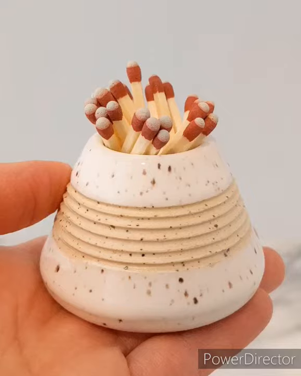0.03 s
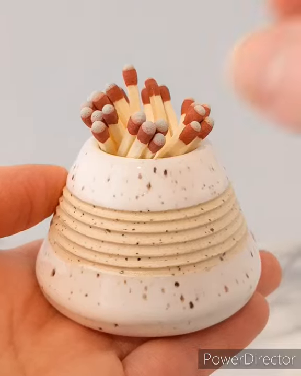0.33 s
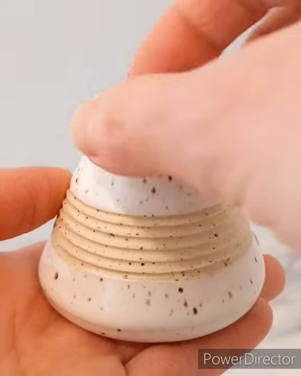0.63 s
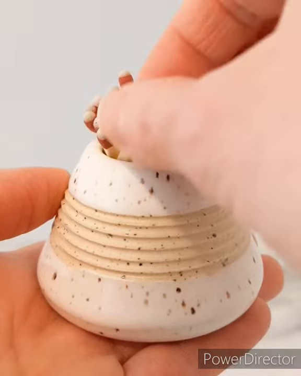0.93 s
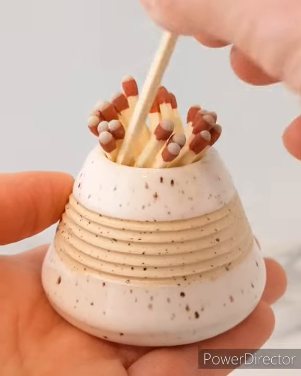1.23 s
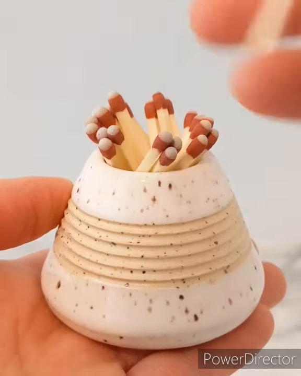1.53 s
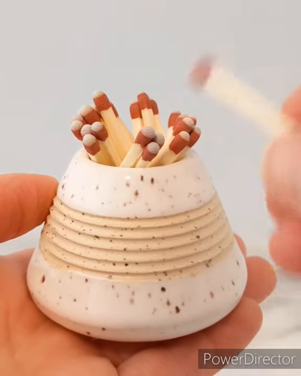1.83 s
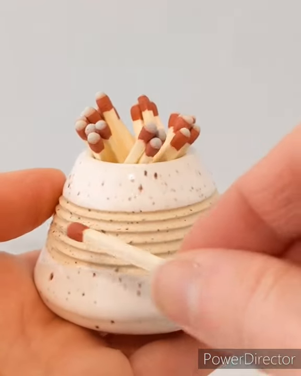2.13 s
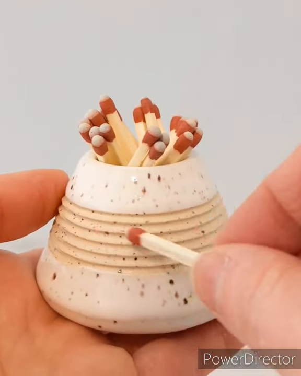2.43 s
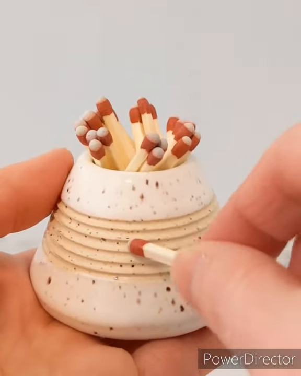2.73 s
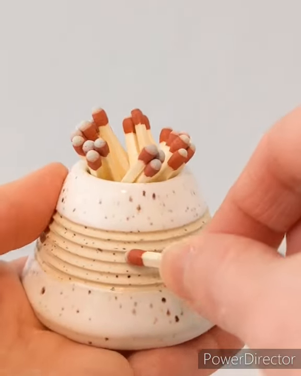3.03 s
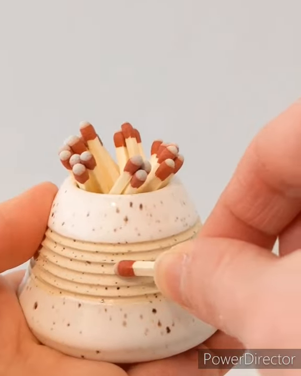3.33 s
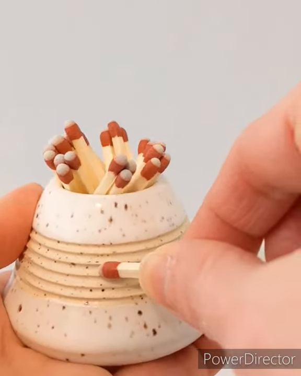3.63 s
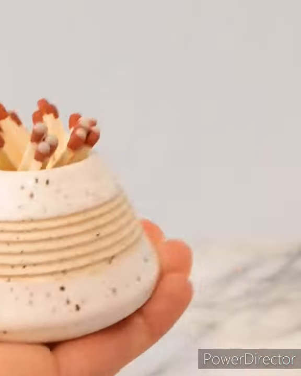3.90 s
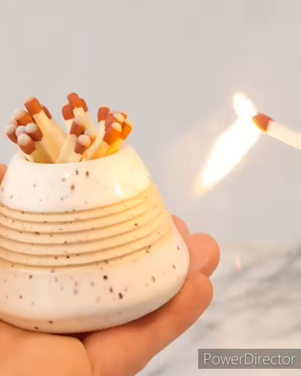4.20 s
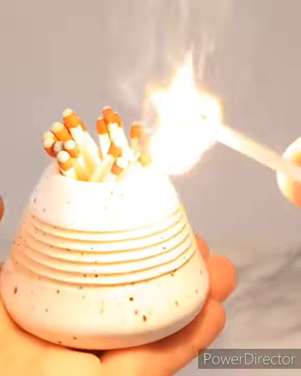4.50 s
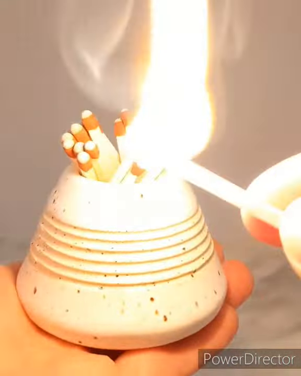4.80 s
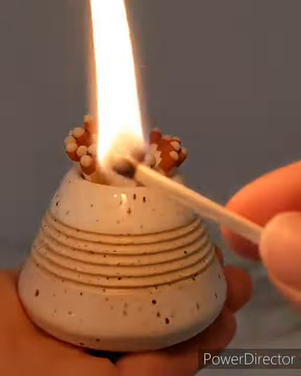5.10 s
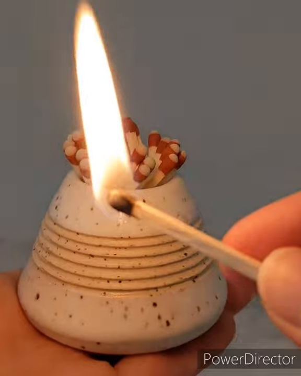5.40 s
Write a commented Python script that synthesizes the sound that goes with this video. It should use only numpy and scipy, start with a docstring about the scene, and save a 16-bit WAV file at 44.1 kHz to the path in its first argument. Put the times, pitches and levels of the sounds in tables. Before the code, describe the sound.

Matchsticks rattle faintly in a ceramic pot, then one match strikes with a sharp snap, fizzes for a second and settles to a quiet flame.

```python
"""Striking a match on stoneware

A match is drawn from a hand-held pot in a quiet room: sticks rattle and the head catches on the ribs.
Stick-slip friction in one fast stroke rings the pot, and ignition puffs air at the right microphone
port. The head fizzes and spits for about a second, then leaves a quiet flame over ventilation rumble."""
import sys
import numpy as np
from scipy import signal
from scipy.fft import rfft, irfft, next_fast_len
from scipy.io import wavfile
from scipy.ndimage import map_coordinates

SR = 44100
rng = np.random.default_rng(int(sys.argv[2]) if len(sys.argv) > 2 else 0)


def master(y):
    """Save y as 16-bit WAV."""
    cut = np.clip(np.atleast_2d(y).T, -1, 1)
    pcm = np.round(cut * 32767)  # scale
    wavfile.write(sys.argv[1], SR, pcm.astype(np.int16))


N = 244755
TIME = np.arange(N) / SR
IGNITION_S, LIGHT_S, LIGHT_ATTACK_S, SPENT_S, SPENT_T60_S = 3.9708, 4.03, 0.034, 5.17, 0.11
HEAD_DB, SAG_DB_PER_S, FLAME_DB = -55, 1.5, -73.5
GAS_DB, SIZZLE_DB = 2.5, -3.5  # relative to the burn level
ROOM_DB, ROOM_LAG_S = -50.5, 0.00027  # the rumble reaches the left port later
OPEN_S, TOP_HZ = 0.12, 15600

# jerks of the striking stroke: (time [s], relative level [dB], decay t60 [s])
STROKE_JERKS = [(3.9610, -31, 0.0029), (3.962, -44, .035), (3.9690, -33.5, 0.022), (3.9709, -9.5, 0.0045),
                (3.9730, -16.5, 0.027), (3.982, -22, 0.029)]
# resonances of the pot: (frequency [Hz], bandwidth [Hz], gain [dB])
POT_MODES = [(1950, 650, 3.5), (2650, 500, -4.5), (4340, 260, 4), (6340, 500, -0.5), (7100, 370, 5.5),
             (8600, 900, 2), (12030, 600, 5.5), (13500, 900, 1)]
# spectral shapes: (frequency [Hz], gain [dB])
GRIT_SPECTRUM = [(300, -9), (900, -16.5), (2000, -8), (2900, -9), (3700, -25), (4300, -5.5), (5300, -2.5),
                 (8500, 5.5), (11000, 1.5), (14000, 6), (16000, -5.5)]  # head scraping on clay
TAIL_SPECTRUM = [(300, -3), (1200, -4), (3000, 0.5), (4800, 1.5), (9000, 0.5), (15000, -7.5)]  # the room's answer to the stroke
GAS_SPECTRUM = [(120, -23.5), (280, 4), (480, -1.5), (600, -1.5), (710, 7), (850, -2), (1500, -0.5),
                (2700, -5.5), (4500, -6.5), (6000, -11.5), (8000, -14.5), (12000, -23)]  # gas rushing from the head
SIZZLE_SPECTRUM = [(3000, -9), (5700, 0), (6900, 0), (7600, 0.5), (9500, -0.5), (11500, 0), (13500, -4),
                   (15500, -11)]  # cells bursting in the head
SHADOW_SPECTRUM = [(2400, 0), (2900, 7.5), (3900, 3), (4700, -6.5), (6800, 4), (10000, -4.5), (13500, 1)]  # the pot screening the left port
SKIN_SPECTRUM = [(1000, -6.5), (4000, -6), (7000, -4), (9000, 0), (12000, -3), (14000, -6), (15500, -11)]  # skin and sleeve brushing
VENT_SPECTRUM = [(25, -45.5), (38, -34), (54, 1), (80, -3), (100, -4.5), (150, -2), (200, -9.5), (300, -19),
                 (500, -26.5), (1100, -28.5), (1500, -32), (2100, -36), (3000, -43.5), (7000, -49.5),
                 (13000, -54), (15500, -61.5)]  # ventilation rumble
# fresh patches of the head flaring: (time [s], half length [s], gas lift [dB], sizzle lift [dB])
FLARE_JETS = [(4.086, 0.021, 7, 6), (4.198, 0.025, 0.5, -1.5), (4.264, 0.024, 4, 7.5),
              (4.328, 0.022, 0.5, 7.5), (4.397, 0.021, 3.5, 6), (4.592, .03, 1.5, 5),
              (4.633, 0.024, 2, 6.5), (4.754, 0.016, 2.5, -0.5), (4.862, 0.02, 1.5, 6.5),
              (4.93, 0.021, 2, 1.5), (5.03, 0.016, 0, 7), (5.093, 0.012, -4, 5.5), (5.143, 0.036, -4, 2.5)]
# brief impulses: (time [s], relative level [dB], ring frequency [Hz], left minus right [dB])
HEAD_SPITS = [(4.0895, -36, 5230, 1), (4.1524, -44.5, 7130, 1), (4.2168, -33, 6210, -2),
              (4.2303, -33, 5100, -4), (4.2502, -25, 7500, 3), (4.3203, -38, 6300, 2),
              (4.3684, -41, 8100, -6), (5.0438, -40, 3060, -10), (5.2827, -45, 4600, -1)]  # the burning head spitting
STICK_KNOCKS = [(1.1003, -42, 6400, -3), (1.1193, -48, 8756, -3), (1.214, -53, 5900, -7),
                (1.2725, -53, 5040, -6), (1.2885, -53.5, 9000, -6), (1.2974, -52, 3780, -5),
                (1.3422, -50, 6800, 5), (1.353, -48, 5600, -5), (1.4323, -46.5, 8800, -1),
                (1.4503, -41.5, 8950, -5), (1.4542, -40.5, 11800, 0), (1.5384, -49.5, 9200, -4),
                (1.5728, -52, 7900, -4), (1.5973, -50.5, 9300, -9)]  # sticks knocking in the pot
RIB_CATCHES = [(2.308, -55, 5150, -3), (2.3176, -54, 7780, 7), (2.686, -55, 7200, -6),
               (2.6922, -45, 8050, -11.5), (3.2316, -43, 5870, -2.5), (3.3033, -54, 10800, 1),
               (3.3235, -57, 8000, -3), (3.3488, -42.5, 9400, -7.5), (3.3537, -46, 9100, 3),
               (3.3898, -41, 3830, -3), (3.3945, -49, 13500, -2), (3.456, -38.5, 10200, 3),
               (3.468, -39.5, 4000, -4), (3.4745, -50, 7000, -2)]  # the head catching on the ribs
WALL_BUMPS = [(2.3855, -39.5, 2040, 3), (2.464, -50, 2100, -2), (3.3893, -45, 1500, 1)]  # the stick bumping the pot's wall
# drawn stick squeaking: (time [s], half length [s], frequency [Hz], level [dB], left minus right [dB])
STICK_SQUEAKS = [(1.356, 0.004, 3600, -64.5, 0), (1.388, 0.03, 3470, -74, 3),
                 (1.359, 0.0063, 8050, -61, -1), (1.426, 0.0054, 1110, -57, -8),
                 (1.447, 0.0053, 1072, -66, -8), (1.577, .008, 8060, -62, -4)]
# sliding contacts: (time [s], half length [s], relative level [dB])
HEAD_DRAGS = [(1.333, .1, -81), (3.221, .007, -64), (3.268, .02, -67), (3.374, .01, -64),
              (3.475, 0.011, -59)]  # match heads dragging with a fine crackle
HAND_BRUSHES = [(0.962, 0.025, -74), (1.12, 0.07, -74), (1.394, 0.072, -72.5), (1.6, 0.074, -68.5),
                (1.759, 0.04, -66), (1.9, 0.064, -66.5), (2.054, 0.09, -61.5), (2.227, 0.015, -64.5),
                (2.904, 0.1, -76.5), (3.427, 0.11, -81)]  # skin and sleeve, one row for each move
# standing waves in the ventilation: (frequency [Hz], bandwidth [Hz], gain [dB])
DUCT_MODES = [(423.7, 22, 1), (564, 19, 2), (670, 56, -0.5), (802, 17, -1.5), (909, 34, 3), (1001, 14, 5.5),
              (1133, 33, 4), (5040, 23, 9)]
# likeness of the rumble at the two ports: (frequency [Hz], coherence [0-1])
VENT_COHERENCE = [(60, 0.93), (200, 1), (300, 0.8), (640, 0.4), (1400, 0.03)]
# balance of the rumble: (frequency [Hz], left minus right [dB])
VENT_BALANCE = [(200, -0.5), (1300, 1.5), (2400, 0.5), (4400, -4.5), (9000, -4), (15000, -1)]


def strike():
    """Stick-slip friction: jerks over the grit excite the hand-damped pot, and the room reverberates."""
    force = sum(undb(db) * fade(TIME - s, t60) for s, db, t60 in STROKE_JERKS)
    friction = grains(rate=11000, spread_db=-4.5) * force
    ring = sum(undb(db) * resonate(resonate(friction, hz, width), hz, width)
               for hz, width, db in POT_MODES)
    scrape = colour(friction, GRIT_SPECTRUM) + ring
    tail = undb(-11.0) * colour(scatter(friction, t60=0.17, wet_db=18.0), TAIL_SPECTRUM)
    return pan(scatter(scrape, t60=0.092, wet_db=-11.5) + tail, 2.5)


def puff(push_s, lag_s, suck_s, push_db, suck_db, port_hz, left_db):
    """Pressure pulse: compression, then rarefaction; the right port's bass cut rings on as a thump."""
    t = TIME - IGNITION_S
    push = undb(push_db) * np.exp(-(t / push_s) ** 2)
    suction = undb(suck_db) * fade(t - lag_s, suck_s)
    right = highpass(push - suction, port_hz, order=5)
    left = undb(left_db) * highpass(right, 1400, order=2)
    return np.array([left, right])


def flare():
    """Combustion noise: gas rushes, cells burst and spit; the pot slowly shadows the left port."""
    gas_lift_db = sum(db * swell(s, length) for s, length, db, _ in FLARE_JETS)
    sizzle_lift_db = sum(db * swell(s, length) for s, length, _, db in FLARE_JETS)
    gas = hiss(GAS_SPECTRUM, rate=7000, spread_db=3.0, diffuse_db=3.0)
    gas *= undb(GAS_DB + gas_lift_db + 1.8 * walk(70))
    sizzle = hiss(SIZZLE_SPECTRUM, rate=4500, spread_db=0.5, diffuse_db=5.0)
    sizzle *= undb(SIZZLE_DB + sizzle_lift_db + 1.9 * walk(45))
    fizz = moving_comb((gas + sizzle) * burn(), spacing_hz=110.4, depth_db=3.5, rate=9)
    shadow = np.interp(TIME, [4.25, 4.75], [0, 1])
    fizz[0] = (1 - shadow) * fizz[0] + shadow * colour(fizz[0], SHADOW_SPECTRUM)
    side_db = np.interp(TIME, [4.05, 4.2, 4.8], [4, -2.5, -4])
    spits = ticks(HEAD_SPITS, snap=14, crumble_t60=0.01, ring_db=-13, width_hz=600,
                  low_hz=800, dull_hz=10400, gain_db=12.5)
    return pan(fizz, side_db) + scatter(spits, t60=0.037, wet_db=5.5)


def burn():
    """Power addition: the envelope of the head, sagging until spent, joins that of the quiet flame."""
    lit = np.clip((TIME - LIGHT_S) / LIGHT_ATTACK_S, 0, 1)
    head = undb(HEAD_DB - SAG_DB_PER_S * (TIME - LIGHT_S))
    release = fade(np.maximum(TIME - SPENT_S, 0), SPENT_T60_S)
    return lit * np.hypot(head * release, undb(FLAME_DB))


def handling():
    """Impact and friction: sticks rattle and squeak, the head catches and drags, the hand brushes."""
    rattles = ticks(STICK_KNOCKS, snap=7.8, crumble_t60=0.005, ring_db=4.5, width_hz=1200,
                    low_hz=2900, dull_hz=11500, gain_db=14.0)
    catches = ticks(RIB_CATCHES, snap=8.0, crumble_t60=0.015, ring_db=3.0, width_hz=3700,
                    low_hz=1550, dull_hz=12600, gain_db=15.5)
    bumps = ticks(WALL_BUMPS, snap=3.6, crumble_t60=0.037, ring_db=-4, width_hz=650,
                  low_hz=420, dull_hz=2970, gain_db=12)
    body = undb(4) * resonate(bumps, hz=720, width_hz=370)
    squeaks = sum(squeak(*row) for row in STICK_SQUEAKS)
    drag = sum(undb(db) * swell(s, length) for s, length, db in HEAD_DRAGS)
    crackle = unit(highpass(grains(rate=670, spread_db=2.5), 2700, order=2)) * drag
    contacts = rattles + catches + bumps + body + crackle
    return brush() + scatter(contacts, t60=0.069, wet_db=-1.0) + squeaks


def ticks(table, snap, crumble_t60, ring_db, width_hz, low_hz, dull_hz, gain_db):
    """Impulse excitation: a snap and a short crumble of micro-slips ring the stick at its own pitch."""
    out, t = np.zeros((2, N)), np.arange(2048) / SR
    lowpass = signal.butter(2, dull_hz, fs=SR, output="sos")
    for s, db, hz, side_db in table:
        slips = rng.standard_normal(len(t)) ** 3 / 4 * fade(t, crumble_t60)  # cubing makes noise spiky
        slips[0] += snap
        slips = signal.sosfilt(lowpass, highpass(slips, low_hz, order=2))
        tick = unit(slips) + undb(ring_db) * unit(resonate(slips, hz, width_hz))
        tick *= undb(db + gain_db) / np.linalg.norm(tick)
        start = int(s * SR)
        out[:, start:start + len(t)] += pan(tick[:N - start], side_db)
    return out


def squeak(s, length, hz, db, side_db, jitter_hz=260):
    """Frictional vibration: the drawn stick rubs its neighbours, its pitch jittering as it slips."""
    pitch_hz = hz + jitter_hz * walk(1500)
    rub = unit(np.sin(2 * np.pi * np.cumsum(pitch_hz) / SR))
    return pan(rub * swell(s, length) * undb(db), side_db)


def brush():
    """Sliding friction: skin and sleeve hiss with each move of the hand."""
    moves = sum(undb(db) * swell(s, length) for s, length, db in HAND_BRUSHES)
    rub = hiss(SKIN_SPECTRUM, rate=15000, spread_db=2.5, diffuse_db=-3)
    rub *= moves * undb(3.2 * walk(39.74))
    return pan(moving_comb(rub, spacing_hz=151.7, depth_db=3.5, rate=5.17), -4.0)


def ventilation():
    """Standing waves colour a rumble that is coherent at both ports in the bass and swells a little."""
    coherence = over_bins(VENT_COHERENCE, N)
    mid, side = rfft(rng.standard_normal((2, N)))
    side *= np.sqrt((1 - coherence) / (1 + coherence))
    delay = np.exp(-2j * np.pi * np.arange(len(mid)) * SR / N * ROOM_LAG_S)
    air = colour(irfft(np.array([(mid + side) * delay, mid - side]), N), VENT_SPECTRUM)
    air += sum(undb(db) * resonate(air, hz, width) for hz, width, db in DUCT_MODES)
    for port, sign in enumerate((1, -1)):
        air[port] = colour(air[port], [(hz, sign * db / 2) for hz, db in VENT_BALANCE])
    swell_db = np.interp(TIME, [0, 2.5], [-1, .5]) + .5 * walk(7.4)
    return air / np.std(air.mean(0)) * undb(ROOM_DB + swell_db)


def grains(rate, spread_db):
    """Shot noise: about `rate` clicks a second, of uneven size, with a random weight at each port."""
    size = undb(spread_db * np.minimum(rng.exponential(size=N), 5))
    onsets = rng.random(N) < rate / SR
    return unit(onsets * size * rng.standard_normal((2, N)))


def hiss(spectrum, rate, spread_db, diffuse_db):
    """Superposition: grains lie within smooth noise that stands for their diffuse reflections."""
    both = grains(rate, spread_db) + undb(diffuse_db) * rng.standard_normal((2, N))
    return unit(colour(both, spectrum))


def scatter(x, t60, wet_db):
    """Reverberation: direct sound plus reflections off hands, table and walls, different at each port."""
    t = np.arange(SR // 4) / SR
    tail = rng.standard_normal((2, len(t))) * fade(t - .0003, t60)
    response = undb(wet_db) * tail / np.sqrt(np.sum(tail ** 2) / 2)
    response[[0, 1], [3, 0]] += 1  # the direct sound reaches the right port 3 samples sooner
    return signal.fftconvolve(x, response, axes=1)[:, :N] / np.hypot(1, undb(wet_db))


def moving_comb(x, spacing_hz, depth_db, rate):
    """Interference: a drifting random spectral ripple stands for echoes off pot and moving fingers."""
    hz, s, frames = signal.stft(x, SR, nperseg=1024)
    field = rng.standard_normal((1024, 256))
    grid = np.meshgrid(hz / spacing_hz, s * rate, indexing="ij")
    ripple = map_coordinates(field, grid, order=1, mode="mirror")
    return signal.istft(frames * undb(depth_db * ripple), SR)[1][..., :N]


def resonate(x, hz, width_hz):
    """Second-order resonance, gain 1 at its centre."""
    return signal.lfilter(*signal.iirpeak(hz, hz / width_hz, fs=SR), x)


def highpass(x, hz, order):
    """Attenuation below a cutoff."""
    return signal.sosfilt(signal.butter(order, hz, "high", fs=SR, output="sos"), x)


def colour(x, points):
    """Spectral shaping by (frequency [Hz], gain [dB]) points."""
    n = next_fast_len(x.shape[-1])
    return irfft(rfft(x, n) * undb(over_bins(points, n)), n)[..., :x.shape[-1]]


def over_bins(points, n):
    """Log-frequency interpolation onto the bins of an n-point transform."""
    hz, value = np.transpose(points)
    bin_hz = np.arange(n // 2 + 1) * SR / n
    return np.interp(np.log(bin_hz + 1), np.log(hz), value)


def pan(x, db):
    """Placement by level difference, left minus right."""
    return x * undb(np.array([db, -db]).reshape(2, -1) / 2)


def walk(rate):
    """Random modulation through `rate` knots a second, with a spread near 1."""
    knots = rng.standard_normal(4096)
    return np.interp(TIME * rate, np.arange(len(knots)), knots)


def swell(s, half_length):
    """Bell-shaped envelope: 1 at time s, 1/e a half length away."""
    return np.exp(-((TIME - s) / half_length) ** 2)


def fade(t, t60):
    """Exponential decay from t = 0, down 60 dB at t60."""
    return (t >= 0) * np.exp(-np.log(1000) * np.maximum(t, 0) / t60)


def undb(db):
    """Decibels to amplitude ratio."""
    return 10 ** (np.asarray(db) / 20)


def unit(x):
    """Normalisation to rms 1."""
    return x / np.sqrt(np.mean(x ** 2))


def scene():
    """Superposition of all sources at the two ports."""
    ignition = puff(push_s=0.0001, lag_s=0.00021, suck_s=0.0071, push_db=-4.0, suck_db=-5.0,
                    port_hz=41.2, left_db=-2.5)
    return ventilation() + handling() + strike() + ignition + flare()


def record(dry):
    """Saturation and band limiting: the input opens after a moment, rounds peaks and cuts the top."""
    opened = np.clip((TIME - OPEN_S) / 0.025, 0, 1)
    lowpass = signal.ellip(8, .2, 70, TOP_HZ, fs=SR, output="sos")
    return signal.sosfilt(lowpass, np.tanh(dry * opened))


dry = scene()
out = record(dry)
master(out)
```